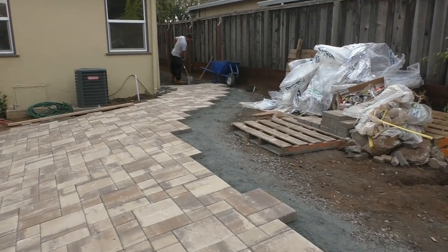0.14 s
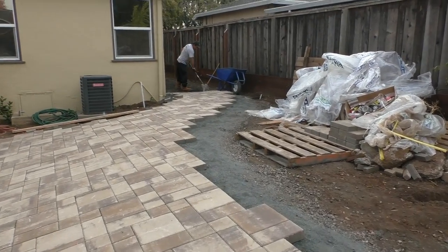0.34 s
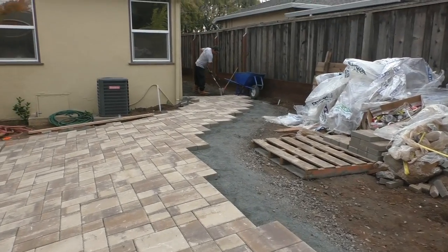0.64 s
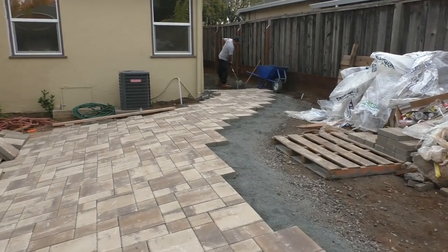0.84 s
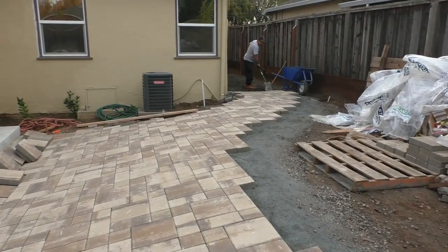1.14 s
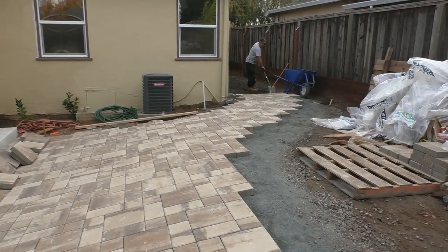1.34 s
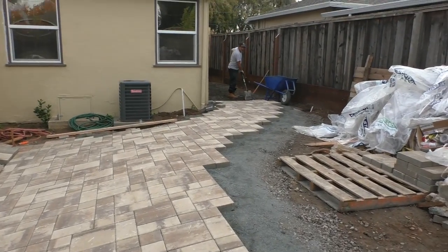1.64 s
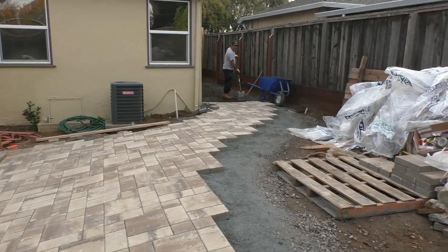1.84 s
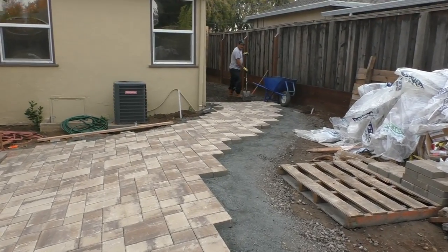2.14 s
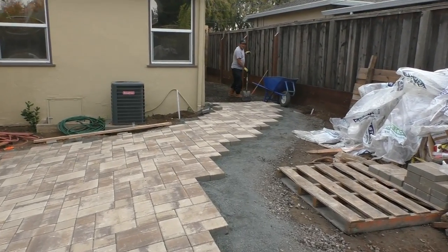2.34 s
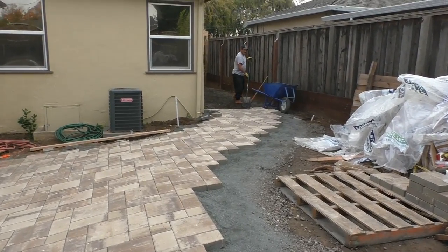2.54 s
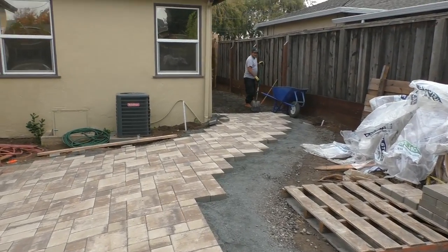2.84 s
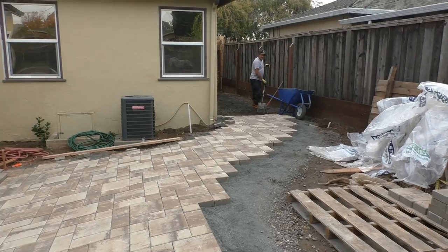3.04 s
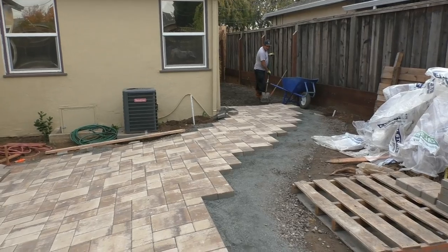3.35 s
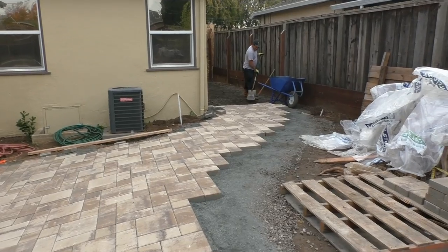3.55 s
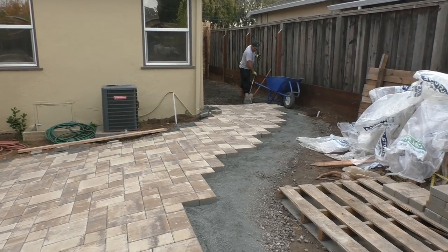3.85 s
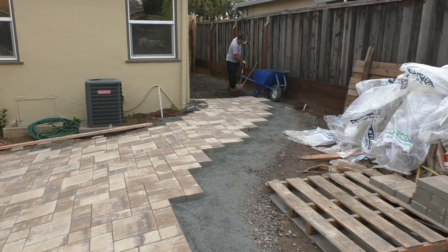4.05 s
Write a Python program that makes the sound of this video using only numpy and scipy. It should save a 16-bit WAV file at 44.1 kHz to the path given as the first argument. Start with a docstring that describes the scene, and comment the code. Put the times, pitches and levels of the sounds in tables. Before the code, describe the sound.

Three gritty, metallic shovel strokes bite into gravel in quick succession, heard from the other end of a yard with a brief echo. Soft knocks sound close by early on. The digging rests while loose stones tick and leaves rustle faintly, then the shovel scrapes in again. A low rumble of faraway traffic and engines stays underneath.

```python
"""Shovelling gravel across a yard

A steel shovel is driven through base gravel at the far end of a yard: the blade drags, jams and
slips on the stones, and its modes ring. House wall and fence answer. Loose stones trickle and
tick, small knocks sound close by, and far traffic rumbles with a few gliding engine tones."""
import sys
import numpy as np
from scipy import signal
from scipy.fft import rfft, irfft, next_fast_len
from scipy.io import wavfile
from scipy.ndimage import uniform_filter1d, map_coordinates

SR = 44100
rng = np.random.default_rng(int(sys.argv[2]) if len(sys.argv) > 2 else 0)


def unload_audio(sound):
    """Save the sound as a 16-bit wav file, at the path given as the first command line argument."""
    columns = np.transpose(np.atleast_2d(sound))
    # keep every value between -1 and 1, then stretch to whole-number steps
    steps = np.round(np.clip(columns, -1, 1) * 32767)
    wavfile.write(sys.argv[1], SR, steps.astype(np.int16))


N = 185043
PREROLL = SR // 2  # samples ahead of t = 0, so the scene opens with echoes in the air


def shovel():
    """Stones grind and jam against the blade, heard directly and through the ringing steel."""
    # stones jamming: t/s, force/dB, loudest ring/Hz, rise/ms, t60/s
    jams = [(-.004, -20.5, 3430, 5.7, 0.044), (0.033, -18, 2120, 6.7, 0.11), (0.07, -19, 2580, 12.6, 0.12),
            (0.562, -23, 2760, 9.8, 0.079), (0.606, -21, 3670, 1.8, 0.17), (0.654, -19, 1260, 5.7, 0.3),
            (0.674, -10, 2340, 6.8, 0.077), (0.7317, -13, 2900, 4.8, 0.057), (0.797, -14, 1140, 4.5, 0.077),
            (0.887, -14, 1330, 5.2, 0.1), (0.918, -23, 1430, 2, 0.14), (0.984, -26.5, 3860, 2.4, 0.15),
            (1.374, -40.5, 3260, 1.8, 0.065), (1.45, -24.5, 3850, 2.1, 0.43), (1.492, -24, 4000, 7.9, 0.47),
            (1.522, -21, 3660, 4, 0.15), (1.547, -16, 3200, 4, 0.086), (1.558, -13.5, 3850, 5, .13),
            (1.5702, -22, 1980, 1.04, 0.093), (1.598, -13.5, 3760, 7, 0.061),
            (1.664, -12, 3730, 4.7, 0.062), (1.675, -15, 3780, 2.5, 0.0437),
            (1.685, -20, 1700, 1.78, 0.026), (1.737, -15.5, 3350, 5, 0.1),
            (1.808, -24.5, 1850, 2.44, 0.039), (1.973, -36.5, 1840, 2.1, 0.12),
            (2.118, -44, 5120, 7.8, 0.17), (2.406, -46.5, 1300, 1.6, 0.091), (2.434, -39, 1287, 3.8, 0.054),
            (3.488, -40.5, 2750, 10, 0.14), (3.907, -21.5, 2750, 2.5, 0.076),
            (3.9756, -14, 3850, 4.5, 0.072), (3.998, -15, 3020, 3.1, 0.072),
            (4.0932, -13.5, 3150, 1.58, 0.042), (4.1174, -18.5, 2580, 3.3, 0.045)]
    # modes of the blade: f/Hz, level/dB
    modes = [(514, -4.5), (720, -8.5), (1118, -7), (1260, -4.5), (1632, -10), (1850, -8), (1985, -4),
             (2340, -6.5), (2490, -3.5), (2750, -4.5), (3014, -5), (3144, -4.5), (3266, -4), (3690, -3),
             (4032, -3.5), (4500, -10.5), (5300, -6.5), (5780, -10), (6880, -9), (8100, -13), (8640, -15)]
    bite_db_per_octave, strike_db, stagger_s = 27.5, 21.5, .002
    t = (np.arange(N + PREROLL) - PREROLL) / SR
    drag, belly_db, grit_db = strokes(t)
    power = drag ** 2 * amp([0 * t, grit_db - 2.5, belly_db - 5.5]) ** 2  # scrape, grit, belly
    mode_hz, mode_db = np.transpose(modes)
    shake = (amp(0.5) * drag) ** 2 * np.ones((len(modes), 1))
    strikes = np.zeros_like(shake)
    age = np.arange(SR // 3) / SR
    for start, db, ring_hz, rise_ms, t60 in jams:
        onset = round(start * SR) + PREROLL
        span = slice(onset, onset + len(age))
        attack = 1 - np.exp(-(1000 * age / rise_ms) ** 2)
        force = (amp(db) * attack * amp(-60 * (age / t60) ** 1.448))[:len(t[span])]
        jam_belly_db = np.interp(start, t, belly_db)
        jam_grit_db = np.interp(start, t, grit_db) - np.log2(t60 / 0.083)  # brief jams are grittier
        power[:, span] += (amp([[0], [jam_grit_db], [jam_belly_db]]) * force) ** 2
        # where the stone bites decides which modes answer; the lowest follow the belly
        chance = rng.standard_normal(len(modes))
        octaves_off = np.abs(np.log2(mode_hz / ring_hz))
        bite_db = np.where(mode_hz < 950, jam_belly_db + 13.5, 5.5 - bite_db_per_octave * octaves_off)
        bite_db += 1.2 * chance
        shake[:, span] += (amp(bite_db - 3)[:, None] * force) ** 2
        # at its height the jam deals one sharp blow, reaching each mode at a slightly different moment
        hit = onset + np.argmax(force) + (stagger_s * SR * np.abs(chance)).astype(int)
        strikes[np.arange(len(modes)), hit] += amp(bite_db + strike_db) * force.max() * np.sign(chance)
    hail = np.array([contacts(3.6, 1.6), contacts(3.9, 0.87), contacts(5.9, 1.7)])
    steel = sum(amp(db) * blade_mode(hail[0] * np.sqrt(drive) + blows, hz)
                for hz, db, drive, blows in zip(mode_hz, mode_db, shake, strikes))
    return amp(-4.5) * gravel(hail * np.sqrt(power)) + amp(-13) * steel


def strokes(t):
    """Each stroke drags and fills the blade's belly; on the lift, drag dies, load spills, grit thins."""
    # strokes: entry/s, lift/s, drag on entry/dB, drag on lift/dB, full belly/dB, grit/dB
    moves = [(-.4, .0, -26.5, -26.5, -7.5, -1.5), (0.562, 0.798, -35, -25, -13, -1.5),
             (1.385, 1.712, -43.5, -27, -13.5, -2.5), (2.106, 2.178, -51.5, -52, -0.5, 1),
             (3.78, 3.87, -60.5, -55, -15, -11), (3.883, 4.197, -23.5, -29, -16, -0.5)]
    empty_db, fill_s, spill_s = 6.5, 0.12, 0.29
    drag_fade_db_per_s, grit_fade_db_per_s = 92, 39
    drag, belly_db, grit_db = np.zeros((3, len(t)))
    for enter, lift, enter_db, lift_db, full_db, gritty_db in moves:
        lifted = np.maximum(t - lift, 0)
        drag_db = np.interp(t, [enter, lift], [enter_db, lift_db]) - drag_fade_db_per_s * lifted
        drag += amp(drag_db) * np.clip((t - enter) / 0.0028 + 1, 0, 1)
        emptiness = np.clip(np.maximum(1 - (t - enter) / fill_s, lifted / spill_s), 0, 1)
        begun = t >= enter - .02
        belly_db[begun] = (full_db - empty_db * emptiness)[begun]
        grit_db[begun] = (gritty_db - grit_fade_db_per_s * np.minimum(lifted, .3))[begun]
    return drag, belly_db, grit_db


def contacts(spread_db, clump_db):
    """A clumpy hail of stone contacts, each a few milliseconds long at its own pitch and strength."""
    size = N + PREROLL
    grains = signal.stft(rng.standard_normal(size + 256), nperseg=192)[2]
    grains *= amp(spread_db * rng.standard_normal(grains.shape))
    chirps = signal.istft(grains, nperseg=192)[1][:size]
    return unit(amp(clump_db * wobble(120, size)) * chirps)


def gravel(hail):
    """The stones' own crunch: three contact streams voiced as mid scrape, high grit and low belly."""
    # gravel spectrum: f/Hz, level/dB
    tone = [(150, -19), (250, -11.5), (510, -13.5), (802, -11), (1260, -3.5), (3060, -3.5), (9660, -5),
            (16000, -20.5)]
    low = lambda hz, edge_hz: 1 / (1 + (hz / edge_hz) ** 6)
    bands = lambda hz: [low(hz, 6970) - low(hz, 800), 1 - low(hz, 8100), low(hz, 790)]
    colour = lambda hz: amp(along(tone, hz)) * bands(hz)
    band_rms = np.sqrt(np.mean(colour(np.arange(SR // 2)) ** 2, axis=1, keepdims=True))
    return filtered(hail / band_rms, colour).sum(0)


def blade_mode(force, hz):
    """One mode of the blade; the gravel lying on it keeps shifting its pitch and muffling it."""
    steps = np.linspace(0, 199, len(force))
    shift, muffle = (np.interp(steps, np.arange(200), knots) for knots in rng.standard_normal((2, 200)))
    carrier = np.exp(2j * np.pi * np.cumsum(hz * (1 + 0.009 * shift)) / SR)
    width_hz = 75 if hz < 950 else 30 + 0.0015 * hz
    pole = np.exp(-np.pi * width_hz / SR)
    drive = amp(2.64 * muffle) * force / carrier
    return np.real(carrier * signal.lfilter([np.sqrt(2 - 2 * pole ** 2)], [1, -pole], drive))


def small_impacts():
    """Stone ticks, steel clinks and a few soft knocks sound between the strokes."""
    # ticks, clinks and knocks: t/s, level/dB, f/Hz, ring/cycles, click share
    hits = [(2.7015, -23, 4380, 3.3, 0.33), (2.7155, -23, 4230, 9.5, 0.23), (2.7575, -36, 1870, 40, .05),
            (2.8245, -32, 3180, 25, .05), (2.8938, -38.5, 1340, 23, 0.18), (3.008, -42, 4000, 5.4, 0.53),
            (3.055, -35, 1050, 10, .1), (3.102, -33.5, 900, 8.9, .1), (3.412, -36.5, 950, 10, .05),
            (3.503, -47, 4480, 340, .1), (3.507, -49, 5360, 330, .1), (3.629, -42, 1300, 25, .05)]
    return taps(hits)


def trickle(count=260):
    """Loose grit settles all the while: tiny damped pings at random moments."""
    times = rng.random(count) * (N / SR - .1)
    pitches_hz = 1900 * np.exp(.6 * rng.standard_normal(count))
    levels_db = -56 + 4.3 * rng.exponential(1, count)
    return taps([(*ping, 5.3, .04) for ping in zip(times, levels_db, pitches_hz)])


def knocks():
    """Dull knocks close by, gone in five cycles."""
    # knocks: t/s, level/dB, f/Hz
    hits = [(.118, -18.5, 650), (0.224, -18.5, 540), (0.272, -30, 503), (1.403, -21.5, 300)]
    return taps([(*hit, 5.0, .029) for hit in hits])


def taps(hits):
    """Damped rings with a noise click on the attack; rows of t/s, level/dB, f/Hz, cycles, click share."""
    out, t = np.zeros(N + PREROLL + SR), np.arange(SR // 20) / SR
    for start, db, hz, cycles, click_share in hits:
        ring = np.sin(2 * np.pi * hz * t) * amp(-60 * t * hz / cycles)
        click = click_share * rng.standard_normal(len(t)) * amp(-60 * t / 0.0079)
        out[round(start * SR) + PREROLL:][:len(t)] += amp(db) * (ring + click)
    return out[:N + PREROLL]


def fence(x):
    """The boards beside the shovel scatter a brief first reflection that widens the treble."""
    # reflection colour: f/Hz, level/dB
    tone = [(2000, -17), (4400, -9.5), (8500, -21), (11500, -62)]
    scatter = rng.standard_normal(SR // 20) * amp(-60 * np.arange(SR // 20) / SR / 0.035)
    side = signal.fftconvolve(np.pad(x, (100, 0)), scatter / np.linalg.norm(scatter))[:len(x)]
    return filtered(side, lambda hz: amp(along(tone, hz))) * [[1], [-1]]


def yard(x):
    """Echoes of wall and fence; each band dies at its own speed, each moment meets other reflections."""
    # echo decay: f/Hz, t60/s
    decay = [(300, 0.87), (1500, 1), (4000, 0.64), (8000, 0.52), (15000, 0.34)]
    # echo width: f/Hz, side level/dB
    width = [(300, -5), (3000, -4), (7000, -15), (10000, -19), (15000, -105)]
    out, step = np.zeros((2, len(x) + 2 * SR)), SR // 3
    padded = np.pad(x, (step, 2 * step))
    for at in range(0, len(x) + step, step):
        hz, t, noise = signal.stft(rng.standard_normal((2, SR)), SR, nperseg=256)
        tail = signal.istft(noise * amp(-60 * t / along(decay, hz)[:, None]), SR, nperseg=256)[1][:, :SR]
        piece = padded[at:at + 2 * step] * np.sqrt(np.hanning(2 * step))
        echo = signal.fftconvolve(piece[None], tail / np.linalg.norm(tail[0]), axes=1)
        out[:, at:at + echo.shape[1]] += echo
    mid, side = out[:, step - 400:][:, :len(x)]
    side = filtered(side, lambda hz: amp(along(width, hz)))
    return np.array([mid + side, mid - side])


def engines():
    """Far vehicles hum: slightly unsteady tones gliding with engine speed."""
    # engine tones: start/s, peak/s, end/s, first f/Hz, last f/Hz, level/dB, swell and fall/(dB/s)
    tones = [(0.35, 0.93, 1.75, 155, 185.8, -45.5, 9), (1.607, 1.7, 2, 200, 201.3, -49, 15),
             (2.206, 2.247, 3.3, 189, 193.5, -49.5, 20), (2.622, 2.703, 2.6, 195.3, 202, -47, 15),
             (2.094, 3.167, 3.16, 306, 340.3, -53, 4), (2.4, 2.7, 3.1, 64, 64.5, -49, 14),
             (3.328, 3.352, 3.55, 342, 324, -56, 9), (3.92, 4.19, 4.2, 163.7, 167.5, -44.5, 5)]
    t, out = np.arange(N) / SR, np.zeros(N)
    for start, peak, end, first_hz, last_hz, db, swell in tones:
        hz = np.interp(t, [start, end], [first_hz, last_hz]) * (1 + 0.0031 * wobble(12))
        gate = np.clip(np.minimum(t - start, end - t) / 0.028 + 1, 0, 1)
        level = gate * amp(db - swell * np.abs(t - peak) + 1.5 * wobble(18))
        out += np.sqrt(2) * level * np.sin(2 * np.pi * np.cumsum(hz) / SR)
    return at_mic(out)


def traffic():
    """Far traffic merges into a low rumble, leaning left."""
    # rumble spectrum: f/Hz, level/dB
    tone = [(25, -43), (47, -15), (70, -2.5), (115, -8), (230, -10.5), (400, -18), (650, -57)]
    return amp(-44.5) * noise_bed(tone, patchy_db=0.55) * amp([[1.5], [-1.5]])


def rustle():
    """A faint rustle of leaves swells once and sinks back."""
    # swell: t/s, level/dB
    swell = [(0, -57.5), (2.3, -51), (2.8, -48), (3.3, -52), (3.7, -57.5)]
    # leaf spectrum: f/Hz, level/dB
    tone = [(300, -12), (500, 0), (800, -9.5), (1300, -1), (2500, -10), (5000, -18.5), (9000, -22)]
    return amp(np.interp(np.arange(N) / SR, *np.transpose(swell))) * noise_bed(tone, patchy_db=3.5)


def hiss():
    """The microphone's faint noise floor."""
    # hiss spectrum: f/Hz, level/dB
    tone = [(2000, 11.5), (8500, -4.5), (11000, 2.5), (16000, -1)]
    return amp(-56.5) * noise_bed(tone, patchy_db=2.5)


def noise_bed(tone, patchy_db):
    """Stereo noise of rms 1 with patches of random gain, widest in the mids."""
    # stereo image: f/Hz, left-right correlation
    likeness = [(85, 1), (130, 0.54), (640, 0.16), (1400, 0.22), (3100, 0.31), (6800, 0.98), (12000, 1)]
    noise = signal.stft(rng.standard_normal((2, N + 512)), nperseg=512)[2]
    patches = uniform_filter1d(uniform_filter1d(rng.standard_normal(noise.shape[1:]), 5, 0), 10, 1)
    pair = signal.istft(noise * amp(patchy_db * unit(patches)), nperseg=512)[1][:, :N]
    angle = lambda hz: np.arccos(np.clip(along(likeness, hz), -1, 1)) / 2
    mid, side = filtered(pair, lambda hz: amp(along(tone, hz)) * [np.cos(angle(hz)), np.sin(angle(hz))])
    return unit(np.array([mid + side, mid - side]))


def at_mic(x):
    """Direct sound reaches the two microphone ports with unequal level and phase."""
    # balance: f/Hz, left minus right/dB
    lean = [(200, 3), (400, -4), (800, -4), (1500, -1.5), (3000, .6), (9000, 0)]
    # phase offset: f/Hz, left lead/rad
    lead = [(100, -0.35), (340, -0.46), (950, 0.71), (3600, 0)]
    left = lambda hz: amp(along(lean, hz) / 2) * np.exp(.5j * along(lead, hz))
    return filtered(x, lambda hz: np.array([left(hz), 1 / left(hz)]))


def amp(db):
    """dB to gain."""
    return 10 ** (np.asarray(db) / 20)


def unit(x):
    """Scaled to rms 1."""
    return x / np.sqrt(np.mean(x ** 2) + 1e-20)


def along(points, hz):
    """A curve through (f/Hz, value) points on a log axis."""
    f, v = np.transpose(points)
    return np.interp(np.log(hz + 1), np.log(f + 1), v)


def filtered(x, response):
    """x through a complex frequency response."""
    size = next_fast_len(x.shape[-1] + SR // 2)
    return irfft(rfft(x, size) * response(np.fft.rfftfreq(size, 1 / SR)), size)[..., :x.shape[-1]]


def wobble(rate, size=N):
    """A smooth random curve, rate knots a second."""
    return map_coordinates(rng.standard_normal(int(size * rate / SR) + 4), [np.arange(size) * rate / SR])


def scene():
    """Shovel, small impacts and grit in the yard's echoes, near knocks almost dry, over the outdoor bed."""
    far = shovel() + small_impacts() + trickle()
    near = knocks()
    send = np.pad(far + 0.43 * near, (800, 0))[:len(far)]  # pre-delayed
    heard = at_mic(far + near) + fence(far) + amp(-10.0) * yard(send)
    return heard[:, PREROLL:] + engines() + traffic() + rustle() + hiss()


def record(dry):
    """Soft clipping rounds off loud peaks; a brick-wall low-pass trims the top."""
    ceiling, knee, top_hz = .9, 2.5, 15900
    rounded = dry / (1 + np.abs(dry / ceiling) ** knee) ** (1 / knee)
    return filtered(rounded, lambda hz: hz < top_hz)


dry = scene()
out = record(dry)
unload_audio(out)
```